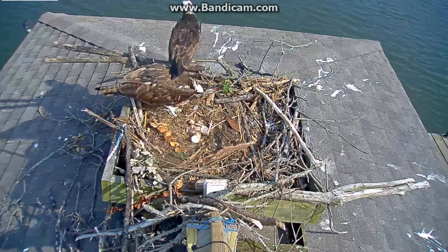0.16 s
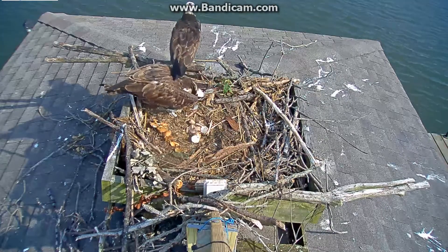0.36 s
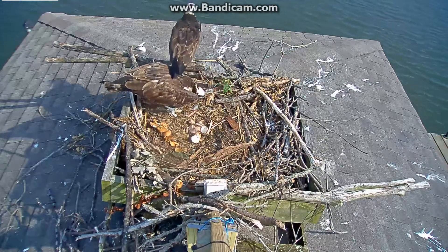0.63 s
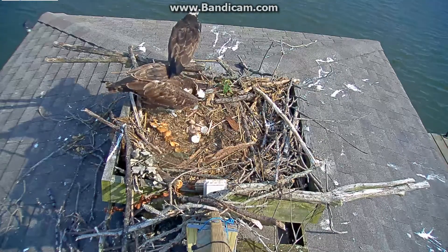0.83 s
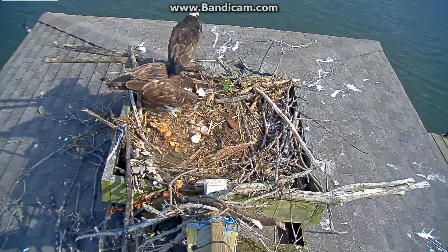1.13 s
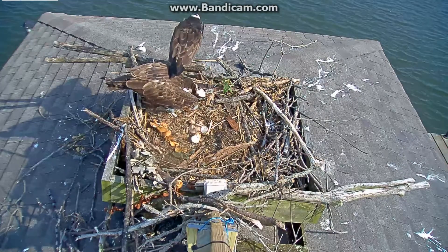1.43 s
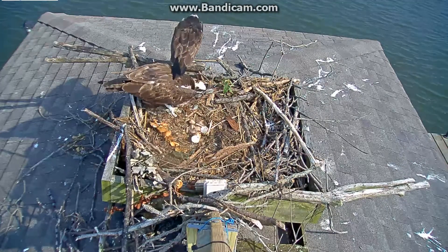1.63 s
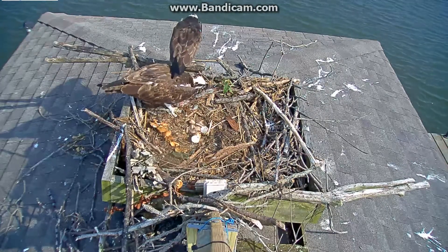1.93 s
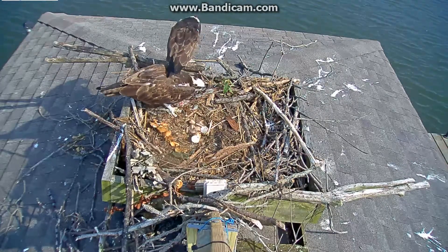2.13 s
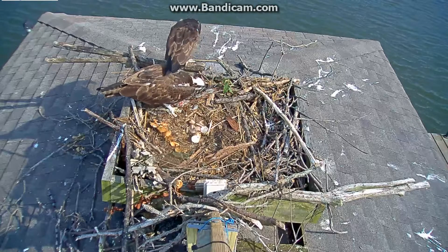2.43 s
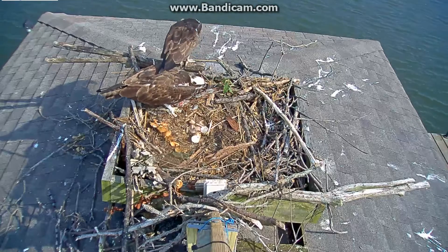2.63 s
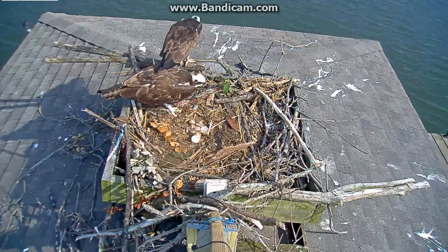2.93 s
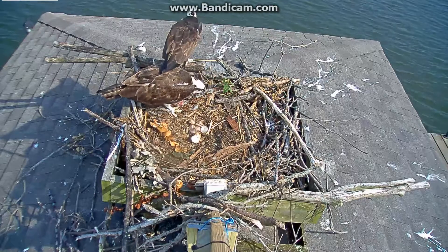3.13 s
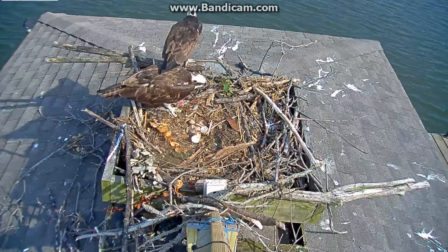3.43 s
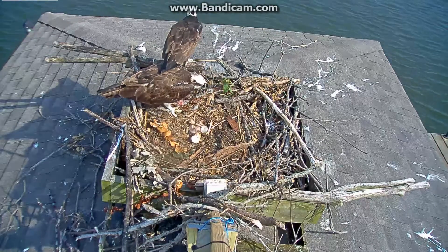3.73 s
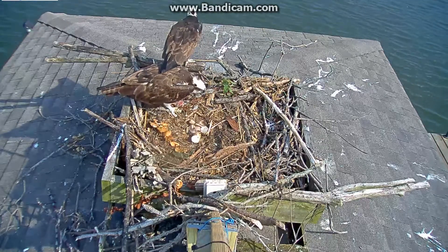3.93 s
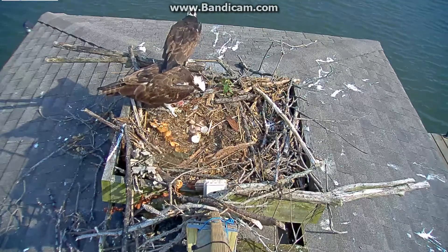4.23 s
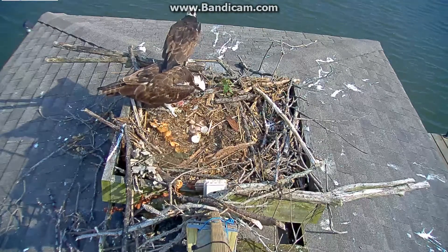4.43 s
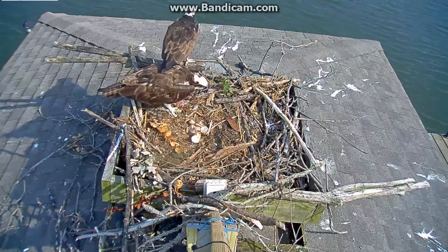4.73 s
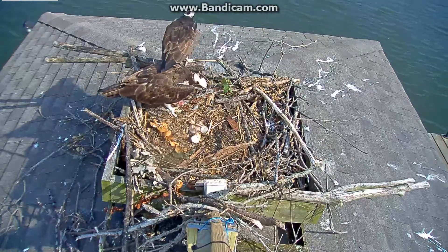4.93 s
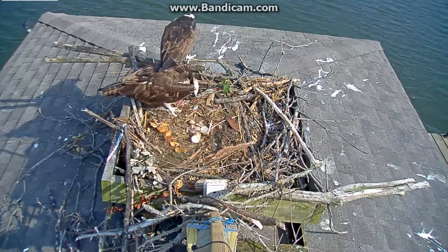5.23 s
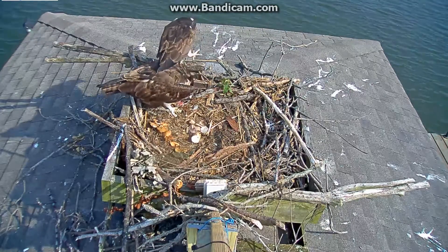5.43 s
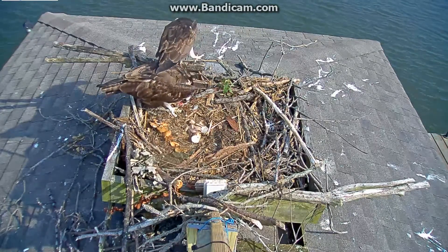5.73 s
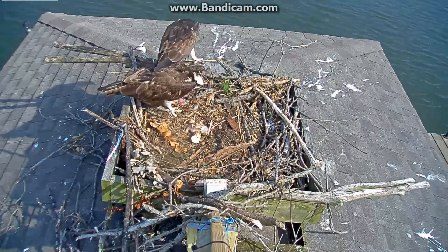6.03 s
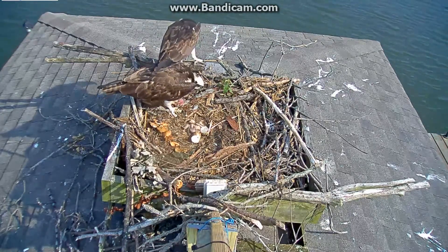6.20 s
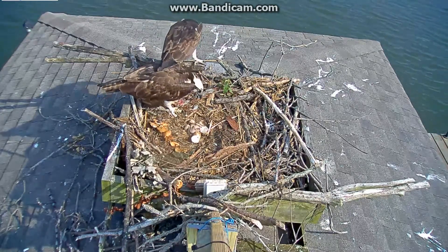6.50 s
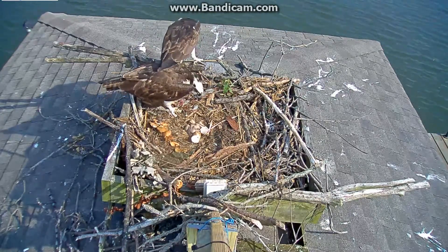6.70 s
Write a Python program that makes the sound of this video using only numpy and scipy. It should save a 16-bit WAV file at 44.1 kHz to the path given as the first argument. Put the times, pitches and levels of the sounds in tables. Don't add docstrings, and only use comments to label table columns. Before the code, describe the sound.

Quick diving peeps and small twig ticks over a faint engine hum, four flat distant whistles, one loud chirp, then heavy wind buffeting.

```python
import sys
import numpy as np
from scipy import signal
from scipy.fft import rfft, irfft, next_fast_len
from scipy.io import wavfile
from scipy.ndimage import uniform_filter1d

SR = 44100
rng = np.random.default_rng(int(sys.argv[2]) if len(sys.argv) > 2 else 0)


def level_to_linear(level):
    exponent = np.asarray(level, float) / 20
    return 10 ** exponent


def wav_out(sig):
    wavfile.write(sys.argv[1], SR, np.round(np.clip(np.atleast_2d(sig).T, -1, 1) * 32767).astype(np.int16))


N = 302495

# (pitch [Hz], wander [Hz], level [dB])
DRONE = [
    (59.5, 2.0, -45.5),
    (120, 9.0, -63),
    (215, 4.0, -74),
    (330, 4.0, -79),
]


def rms_one(x):
    return x / np.sqrt(np.mean(x ** 2) + 1e-20)


def in_time(rows):
    s, *columns = np.transpose(rows)
    return [np.interp(np.arange(N) / SR, s, c) for c in columns]


def at_hz(points, hz):
    known_hz, known_db = np.transpose(points)
    return np.interp(np.log(hz), np.log(known_hz), known_db)


def drift(rate):
    r = np.exp(-80 * np.pi * rate / SR)
    slow = signal.lfilter([1], [1, -2 * r, r * r], rng.standard_normal(N // 40 + 2002))[2000:]
    return np.interp(np.arange(N) / 40, np.arange(len(slow)), rms_one(slow))


def coloured(spectrum):
    size = next_fast_len(N)
    hz = np.maximum(np.arange(size // 2 + 1) * SR / size, 1)
    white = rfft(rng.standard_normal(size))
    return rms_one(irfft(white * level_to_linear(at_hz(spectrum, hz)), size)[:N])


def resonance(x, hz, width_hz):
    r = np.exp(-np.pi * width_hz / SR)
    zeros = np.array([1, 0, -1]) * (1 - r * r) / 2
    return signal.lfilter(zeros, [1, -2 * r * np.cos(2 * np.pi * hz / SR), r * r], x)


def steep_resonance(x, hz, width_hz):
    return resonance(resonance(x, hz, width_hz), hz, width_hz)


def add(out, s, sound):
    i = round(s * SR)
    out[i:i + len(sound)] += sound[:N - i]


def tone(hz, db, multiple=1):
    return np.sqrt(2) * level_to_linear(db) * np.sin(2 * np.pi * multiple * np.cumsum(hz) / SR)


def soft_ends(size, fade_s):
    t = np.arange(size) / SR
    return np.clip(np.minimum(t, t[::-1]) / fade_s, 0, 1)


def swell_db(t, s, fade_ms):
    rise_share, roundness = 0.79, 1.5
    late = (t - s) * 1000 / max(fade_ms, 12)
    return -10 * np.maximum(late, -late / rise_share) ** roundness


def gusts():
    # (peak [s], rumble [dB], time to fade 10 dB [ms], rustle over rumble [dB], sway [Hz])
    gust_peaks = [(0.07, -17.5, 21, -27, 66.3), (.108, -21.5, 41, -19, 56.25),
                  (0.259, -27.5, 48, -23, 42.8), (0.307, -26.5, 63.5, -22, 54.4),
                  (0.507, -20.5, 49, -30, 44.78), (0.57, -40, 47.5, -28, 59.25),
                  (0.631, -23, 58.5, -22.5, 72.7), (0.694, -14.5, 42, -12.5, 61.65),
                  (0.82, -24, 54, -18, 40.04), (0.948, -36, 94, -40, 52.97), (1.104, -32, 100, -19, 50.98),
                  (1.209, -29.5, 99, -28, 41.17), (1.355, -27, 48, -32, 42.03),
                  (1.427, -27, 93.5, -27.5, 56.2), (1.548, -39, 77, -21, 35.35),
                  (1.647, -29.5, 35, -29.0, 50.75), (1.763, -30.5, 46, -37, 32.76),
                  (4.27, -21.5, 33.5, -26, 49.66), (4.338, -21, 27, -25.5, 39.86),
                  (4.385, -28, 25, -35, 34.8), (4.51, -33, 47, -32, 47.77), (4.687, -24.5, 60, -28, 65.23),
                  (4.779, -30.5, 61, -20, 52.3), (4.856, -16.5, 49.5, -29, 49.67),
                  (5.07, -37.5, 99, -21, 52.5), (5.287, -41, 59, -32, 54.65),
                  (5.554, -30, 38.5, -12, 54.65), (5.73, -37.5, 48, -33, 48.5),
                  (5.905, -35.5, 102, -20, 45.1), (6.005, -28.5, 34, -33, 57.2),
                  (6.064, -32.5, 44, -18, 38.7), (6.195, -29.5, 34, -21, 75.4),
                  (6.238, -18, 42, -28, 50.43), (6.288, -14.5, 75, -16, 58.76), (6.36, -9.5, 29, -9, 66.2),
                  (6.428, -24.5, 102, -9.5, 48.67), (6.473, -19.5, 108.5, -21, 49.6),
                  (6.535, -14.5, 62.5, -3, 57.54), (6.585, -21.5, 97, -22, 45.72),
                  (6.697, -15.5, 43, -26, 54.5), (6.811, -17, 94.5, -11, 62.4)]
    # (peak [s], level [dB], time to fade 10 dB [ms])
    bursts = [(.06, -44, 34), (.115, -45.5, 41), (.5, -48, 35), (.672, -34.5, 35.5), (.735, -39.5, 50),
              (.83, -44.5, 35), (1.37, -57, 59), (4.78, -49, 32), (4.855, -42, 40), (6.21, -36.5, 33),
              (6.302, -31, 42), (6.345, -24.5, 36), (6.42, -28, 29), (6.51, -27.5, 38.5), (6.56, -28.5, 45),
              (6.71, -36, 30.5), (6.77, -31, 35), (6.835, -36, 38)]
    # (time [s], rumble [dB])
    breeze = [(0, -32), (.9, -30.5), (1.0, -41), (1.5, -39), (1.9, -44), (2.6, -43), (3.5, -44.5),
              (4.0, -43.5), (4.2, -48), (5.1, -42.5), (5.35, -44), (5.8, -43), (6.17, -37), (6.25, -40.5),
              (6.86, -28)]
    sway_db, eddy_db, gust_rustle_db, breeze_rustle_db = -1.5, -6, -6, -18.5
    sag_per_s = 3.0
    t = np.arange(N) / SR
    breeze_db, = in_time(breeze)
    rumble_power = level_to_linear(breeze_db) ** 2
    rustle_power = level_to_linear(breeze_db + breeze_rustle_db) ** 2
    sway, wobble = np.zeros(N), np.exp(.1 * drift(11.97))
    for s, db, fade_ms, rustle_db, hz in gust_peaks:
        near = slice(max(0, round((s - .3) * SR)), round((s + .4) * SR))
        level_db = db + swell_db(t[near], s, 0.88 * fade_ms)
        sway_hz = hz * np.exp(-sag_per_s * (t[near] - s)) * wobble[near]
        sway[near] += tone(sway_hz, level_db + sway_db)
        rumble_power[near] += level_to_linear(level_db + eddy_db) ** 2
        rustle_power[near] += level_to_linear(level_db + rustle_db + gust_rustle_db) ** 2
    for s, db, fade_ms in bursts:
        rustle_power += level_to_linear(db + swell_db(t, s, fade_ms)) ** 2
    return sway, np.sqrt(rumble_power), np.sqrt(rustle_power)


def wind():
    # (frequency [Hz], density [dB per Hz])
    thump_spectrum = [(11, -49), (20, 4), (43, -5.5), (65, -6), (110, -9.5), (160, -29), (260, -65),
                      (440, -120)]
    # (frequency [Hz], density [dB per Hz])
    rustle_spectrum = [(60, -32), (110, 9), (160, 8.5), (220, -2.5), (300, -7.5), (530, -19.5), (800, -32),
                       (1300, -41), (2000, -51.5), (4000, -73)]
    sway, rumble, rustle_gain = gusts()
    hum_power = level_to_linear(DRONE[0][2]) ** 2
    gust = np.sqrt(np.maximum(rumble ** 2 - hum_power, .2 * rumble ** 2))
    low_cut = signal.butter(2, 32, "high", fs=SR, output="sos")
    thump = signal.sosfilt(low_cut, coloured(thump_spectrum))
    thump = thump / (uniform_filter1d(thump ** 2, size=3500) + 1e-3) ** .3
    rustle = coloured(rustle_spectrum) * level_to_linear(2.2 * drift(22))
    push = sway + gust * rms_one(thump) + rustle_gain * level_to_linear(-1.5) * rms_one(rustle)
    bend = push ** 2 - uniform_filter1d(push ** 2, size=2000)
    return .5 * np.tanh((push + 0.39 * bend) / .5)


def background():
    # (frequency [Hz], density [dB])
    air = [(88, -28.5), (150, -8), (261, -11.5), (328, -12), (619, -17), (945, -18), (1040, -19.5),
           (1310, -18.5), (1570, -17), (1940, -16), (3370, -13), (6460, -21), (7360, -27.5), (9570, -64),
           (16200, -120)]
    # (pitch [Hz], level [dB])
    whine = [(1050, -80), (1588, -81), (2099, -77), (2132, -82), (3822, -82), (4172, -82), (4231, -82),
             (4517, -82), (5211, -82), (5905, -85), (6605, -85)]
    out = level_to_linear(-61) * coloured(air)
    for hz, wander_hz, db in DRONE:
        out = out + tone(hz + wander_hz * drift(5), db + 2.8 * drift(7))
    for hz, db in whine:
        out = out + tone(hz + 3.0 * drift(4), db + 1.2 * drift(3))
    return out


def twitter():
    # (time [s], level [dB])
    flock = [(0.0, -63), (2.39, -66), (2.71, -65), (3.36, -61), (4.07, -61), (4.42, -55.5), (4.77, -69),
             (4.85, -56.5), (5.22, -61), (5.52, -62.5), (5.73, -53.5), (6.21, -56.5), (6.32, -56),
             (6.86, -62.5)]
    chips_per_s = 130
    level_db, = in_time(flock)
    draws, chips = rng.random((N // 64, 5)), np.zeros(N)
    for k in np.flatnonzero(draws[:, 0] < chips_per_s * 64 / SR):
        pitch, bend, length, size = draws[k, 1:]
        u = np.linspace(-1, 1, round((0.0012 + 0.0074 * length) * SR))
        hz = 2600 + 1500 * pitch - 450 * u * (1.3 * bend - .4)
        add(chips, k * 64 / SR, tone(hz, 9 * size) * (1 - u ** 2))
    blur = steep_resonance(rng.standard_normal(N), 3280, 1000) * level_to_linear(3.0 * drift(30))
    return level_to_linear(level_db - 4) * rms_one(rms_one(blur) + level_to_linear(-3) * rms_one(chips))


def crackle():
    twigs_per_s = 22
    sizes = level_to_linear(4.5 * np.minimum(rng.exponential(1, N), 3)) * (rng.random(N) < twigs_per_s / SR)
    bright = rng.random(N) < .35
    dull_snaps = resonance(sizes * ~bright, 3400, 1300)
    bright_snaps = resonance(sizes * bright, 5600, 2500)
    return level_to_linear(-61.0) * (dull_snaps + .6 * bright_snaps)


def flicks():
    # (time [s], peak [dB], centre [Hz], decay [ms])
    eddies = [(.058, -27.5, 134, 13.6), (.058, -62, 850, 4.5), (.106, -63, 510, 8), (.122, -52, 300, 5.5),
              (.303, -54, 400, 5.5), (.675, -51, 500, 8), (.75, -55, 800, 4), (.82, -53, 452, 8),
              (6.208, -51, 498, 5.8), (6.302, -26, 140, 8), (6.306, -55, 890, 10), (6.338, -48, 750, 3.1),
              (6.352, -28, 140, 11), (6.356, -54, 1050, 7.8), (6.37, -44, 550, 11),
              (6.417, -45.5, 845, 7.9), (6.487, -48, 850, 5), (6.511, -47.5, 905, 12),
              (6.512, -22, 125, 11), (6.533, -51, 1095, 3.5), (6.556, -43.5, 650, 12),
              (6.575, -49.5, 1700, 4), (6.604, -51, 700, 5), (6.725, -49.5, 453, 8)]
    out, t = np.zeros(N), np.arange(3000) / SR
    for s, db, hz, decay_ms in eddies:
        late = 1000 * t / decay_ms
        puff = rng.standard_normal(len(t)) * late * np.exp(-2 * late)
        flick = steep_resonance(puff, hz, 0.45 * hz)
        add(out, s, flick / np.max(np.abs(flick)) * level_to_linear(db))
    return out


def peeps():
    # (top of the arch [s], top to end [s], top [Hz], arch [dB], dive [dB])
    calls = [(0.204, 0.025, 3900, -47.5, -51), (.460, .031, 4220, -46, -45.5),
             (0.694, .033, 3950, -44.5, -43.5), (.930, 0.025, 4130, -52.5, -40),
             (1.182, 0.0355, 5000, -49.5, -42), (1.461, .033, 5420, -61, -42),
             (1.718, 0.036, 5500, -46, -40), (1.972, .032, 4550, -53.5, -40),
             (2.221, .039, 5520, -56, -41.5), (2.474, 0.0265, 5270, -88, -48.5),
             (2.973, 0.033, 5600, -50, -64), (3.492, 0.05, 5370, -56, -55.5),
             (3.761, .045, 4700, -55.5, -62), (4.047, 0.037, 5800, -49, -41.5),
             (4.318, .031, 5510, -57.5, -41.5), (4.620, .015, 3800, -52.5, -43.5),
             (4.933, 0.023, 3760, -50, -50)]
    overtones_db = [-1, -4, -6]
    # (frequency [Hz], gain [dB])
    beak = [(1200, -26), (1550, -11), (1950, -6), (2500, -19), (3050, -4), (3450, 0), (4200, -5),
            (5000, -20), (6000, -19), (7200, -32)]
    climb_s, climb_s_per_octave, low_top_hz = .0095, .022, 3900
    end_hz, rise_hz, dive_bend, landing_hz = 1323, 378.3, 2.3, 587
    half_db, flutter_db, jitter, rasp_db = -17, 3, .035, -9
    out, shake, flutter = np.zeros(N), drift(170), drift(150)
    rasp = rms_one(steep_resonance(rng.standard_normal(N), 3600, 2200))
    for top_s, fall, top_hz, arch_db, dive_db in calls:
        climb = climb_s + climb_s_per_octave * np.log2(top_hz / low_top_hz)
        s = top_s - climb
        t = np.arange(round((climb + fall) * SR)) / SR - climb
        now = slice(round(s * SR), round(s * SR) + len(t))
        down = np.clip(t / fall, 0, 1)
        hz = top_hz - rise_hz * climb / climb_s * np.clip(-t / climb, 0, 1) ** 2
        hz = hz - (top_hz - end_hz + landing_hz) * down ** dive_bend
        hz = end_hz + landing_hz * np.logaddexp(0, (hz - end_hz) / landing_hz)
        hz = hz * (1 + jitter * down * shake[now])
        push = np.minimum(np.interp(hz, [3900, 4500], [1, 0]), np.interp(down, [.25, .6], [0, 1]))
        effort_db = arch_db + push * (dive_db - arch_db) + flutter_db * (.6 + .4 * down) * flutter[now]
        voice = np.zeros(len(t))
        for k, db in enumerate(overtones_db, 1):
            voice += tone(hz, effort_db + db + at_hz(beak, k * hz), k)
        strain = np.interp(down, [.45, .65, .85], [0, 1, 0])
        voice += strain * (tone(hz, effort_db + half_db, .5) + level_to_linear(effort_db + rasp_db) * rasp[now])
        add(out, s, voice * soft_ends(len(t), .003))
    return out


def notes():
    # (start [s], length [s], top [Hz], depth [Hz], level [dB])
    arches = [(1.166, 0.023, 3370, 280, -56), (2.365, 0.045, 3290, 60, -62.5), (2.98, 0.052, 1906, 60, -71),
              (4.432, 0.026, 3930, 400, -60), (4.506, 0.022, 3830, 450, -59.5),
              (4.700, 0.081, 4560, 45, -71), (4.774, .031, 4820, 20, -69.5), (5.501, 0.034, 4290, 130, -61),
              (5.727, 0.024, 1510, 40, -56), (6.049, 0.032, 3620, 608, -44),
              (6.193, 0.019, 3700, 900, -57.5), (6.358, 0.045, 3235, 620, -45.5),
              (6.609, 0.02, 4370, 600, -61), (6.694, .016, 4250, 550, -56), (6.76, 0.02, 4400, 800, -58),
              (6.838, 0.017, 4400, 750, -61)]
    # (start [s], length [s], first [Hz],
    # last [Hz], level [dB])
    slides = [(2.205, 0.0073, 3600, 2620, -50.5), (2.644, 0.042, 2880, 2500, -62.5),
              (3.646, 0.031, 3556, 3000, -55.5), (3.873, 0.05, 4000, 3800, -65),
              (4.016, .009, 4800, 4550, -53), (4.022, 0.012, 4140, 3900, -49.5),
              (4.028, 0.005, 4900, 5550, -60), (4.153, 0.018, 3310, 2890, -58),
              (4.205, 0.070, 3120, 3300, -54), (4.277, 0.0068, 3800, 3370, -52),
              (4.296, 0.011, 3900, 3260, -54), (4.338, 0.005, 3540, 3280, -37),
              (4.788, 0.025, 3734, 3000, -52), (4.846, 0.016, 3340, 2960, -57),
              (5.725, .036, 3820, 3450, -54), (6.517, 0.032, 3545, 3075, -55),
              (6.745, .05, 3900, 3830, -64.5), (6.624, 0.0075, 4400, 3800, -61),
              (6.415, 0.0077, 3200, 3350, -44.5), (.908, 0.012, 3200, 3830, -63),
              (1.946, 0.017, 3500, 4200, -60), (3.008, 0.022, 3600, 3100, -61.5),
              (3.236, 0.027, 5400, 3370, -58), (3.266, 0.009, 3450, 3000, -49.5),
              (3.273, 0.01, 2700, 1304, -60.5), (3.508, 0.013, 4860, 3830, -60),
              (3.528, .01, 3200, 1710, -57), (4.459, 0.022, 3900, 3200, -65),
              (4.596, .02, 3100, 3680, -55.5), (4.628, .016, 3800, 3650, -59),
              (5.214, 0.008, 3830, 4480, -53), (5.241, .012, 4300, 3530, -60),
              (6.398, 0.0069, 2480, 1210, -59), (4.196, .016, 3900, 3470, -60),
              (1.446, .02, 4720, 5300, -66), (1.990, 0.0069, 4190, 3840, -46),
              (3.005, .02, 2180, 1950, -62.5),
              (.208, .015, 3800, 3050, -44.5), (.470, .010, 3750, 3500, -46),
               (0.93, 0.011, 4000, 2900, -46.5), (1.166, .01, 3900, 4700, -63),
               (1.200, 0.011, 3850, 3330, -40.5), (1.488, .008, 4100, 3400, -54),
               (1.7, 0.02, 3700, 5300, -65), (1.73, 0.0063, 4280, 3850, -51),
               (2.16, 0.0068, 5800, 5700, -55), (4.342, 0.0053, 6000, 5500, -55),
               (5, .009, 4500, 3200, -47.5), (4.079, .007, 6000, 5000, -55), (2.498, .005, 3700, 3300, -55),
               (.222, .012, 3300, 1600, -63)]
    # (start [s], length [s], first [Hz], last [Hz], level [dB])
    hooks = [
        (3.907, 0.0206, 3530, 4070, -54.5),
        (3.923, 0.031, 3900, 3200, -51.5),
        (5.665, 0.013, 2040, 1940, -51),
        (5.724, 0.067, 2300, 2000, -58.5),
        (5.75, 0.019, 4700, 4000, -53),
    ]

    def arch(v, top, depth):
        return top - depth * (2 * v - 1) ** 2

    def slide(v, first, last):
        return first + (last - first) * v

    def hook(v, first, last):
        return first + (last - first) * v ** 1.8

    out, flutter = np.zeros(N), level_to_linear(2.0 * drift(90))
    for rows, shape in [(arches, arch), (slides, slide), (hooks, hook)]:
        for s, length, *pitch, db in rows:
            v = np.linspace(0, 1, round(length * SR))
            swell = (1 - (2 * v - 1) ** 2) ** 0.85
            add(out, s, tone(shape(v, *pitch), db) * swell)
    return out * flutter


def ticks():
    # (time [s], peak [dB], centre [Hz], decay [ms])
    twigs = [(.838, -45.5, 3600, 3.8), (.983, -50.5, 2980, 13), (1.444, -44, 3300, 1.9),
             (1.678, -47, 3280, 2.2), (1.702, -41.5, 3300, 3.1), (1.718, -39, 3400, 1.8),
             (1.92, -45.5, 6000, 0.5), (2.536, -46.5, 3900, 2.8), (2.545, -44, 4170, 1),
             (2.7325, -41.5, 3383, 2.0), (2.802, -41.5, 5870, 0.46), (2.832, -41.5, 2820, 1.8),
             (2.916, -44.5, 6100, 0.43), (2.957, -44.5, 3180, 3.3), (3.001, -43, 5840, 0.56),
             (3.474, -39.5, 3670, 2.5), (3.744, -45, 3515, 1.44), (4.29, -47.5, 3384, 2.1),
             (4.951, -58.5, 4520, 1.2), (4.976, -50, 4700, 4.0), (4.995, -49, 4307, 9.3),
             (6.046, -61, 4130, 1.5), (6.266, -55.5, 3950, 1.3), (6.277, -43.5, 3520, 1.7),
             (6.414, -39.5, 3380, 3.0), (6.472, -43.5, 2970, 12), (0.415, -45.5, 2800, 2.4),
             (1.1, -49, 3380, 4), (2.447, -52.5, 3800, 1.7), (2.57, -53, 5300, 0.85),
             (2.721, -48, 3000, 2.0), (2.756, -50, 1900, 2.8), (2.933, -47, 3200, 3.3),
             (3.144, -50, 2800, 1.9), (3.172, -61, 3800, 4.0), (3.206, -50, 6200, 0.38),
             (3.461, -48.5, 4250, 1.6), (5.001, -43, 3600, 2.0), (5.009, -46.5, 3600, 4.0),
             (5.265, -55, 1700, 2.0), (6.351, -62, 1600, 1.5), (6.415, -47, 4000, 5.5),
             (6.48, -46, 3910, 6.7), (6.672, -51, 3200, 5.1), (1.549, -48.5, 5630, .4),
             (3.268, -52, 3300, 2.9)]
    # (time [s], peak [dB], centre [Hz], decay [ms], low knock [dB])
    taps = [
        (.4275, -43.5, 4000, 0.6, -39),
        (1.727, -39, 3700, 4.0, -46.5),
        (1.992, -46.5, 4320, 1.6, -44),
        (2.028, -40, 3800, 2.0, -41),
        (5.738, -39, 3300, 3.0, -63),
        (6.576, -46, 3630, 0.81, -54.5),
    ]
    twig_knock_db, knock_hz, knock_width_hz = -70, 1320, 910
    width_share, width_hz_ms, rise_share = 0.34, 450, 0.077
    out, t = np.zeros(N), np.arange(1200) / SR
    rows = [(*row, twig_knock_db) for row in twigs] + list(taps)
    for s, db, hz, decay_ms, knock_db in rows:
        rise = np.minimum(1000 * t / (rise_share * decay_ms), 1)
        puff = rng.standard_normal(len(t)) * np.exp(-1000 * t / decay_ms) * rise
        snap = steep_resonance(puff, hz, width_share * hz + width_hz_ms / decay_ms)
        knock = resonance(puff, knock_hz, knock_width_hz)
        snap = snap / np.max(np.abs(snap)) * level_to_linear(db)
        knock = knock / np.max(np.abs(knock)) * level_to_linear(knock_db)
        add(out, s, snap + knock)
    return out


def whistles():
    # (start [s], length [s], first [Hz], last [Hz], level [dB])
    calls = [
        (4.157, 0.12, 2790, 2850, -45),
        (4.412, 0.14, 2815, 2867, -44),
        (4.672, .14, 2816, 2866, -43.5),
        (4.936, 0.14, 2820, 2860, -43),
    ]
    attack_s, swell_s, release_s = 0.023, 0.082, 0.011
    edge_db, soft_db, waver_hz = -19.5, -3, 6.2
    out, waver_db, t = np.zeros(N), 0.46 * drift(40), np.arange(N) / SR
    for s, length, first_hz, last_hz, db in calls:
        steps = s + np.array([0, attack_s, swell_s, length - release_s, length])
        level_db = db + np.interp(t, steps, [edge_db, soft_db, 0, -1.2, edge_db])
        pitch = np.interp(t, [s, s + length], [first_hz, last_hz]) + waver_hz * waver_db
        out += tone(pitch, level_db + waver_db) * (t > s) * (t < s + length)
    return out


def chirp():
    # (time [s], pitch [Hz], level [dB], beak opening as second partial over first [dB])
    curve = [
        (5.558, 2230, -51, -38),
        (5.568, 2078, -32.5, -29),
        (5.574, 2024, -31.5, -16),
        (5.581, 2001, -27, -5.5),
        (5.604, 2026, -20, -7),
        (5.615, 1980, -26, 1),
        (5.635, 1864, -28.5, 6),
        (5.649, 1732, -33.5, 2),
        (5.656, 1510, -51, -4),
    ]
    third_db, third_opens, third_effort = -17.5, 1.34, 0.54
    rasp_db, rasp_spread_s, halo_db = -20.5, 0.06, -11.5
    hz, first_db, open_db = in_time(curve)
    third_level_db = first_db + third_db + third_opens * open_db + third_effort * (first_db - first_db.max())
    voice = tone(hz, first_db) + tone(hz, first_db + open_db, 2) + tone(hz, third_level_db, 3)
    air = rng.standard_normal(N)
    rasp = rms_one(steep_resonance(air, 3350, 980))
    rasp = rasp + level_to_linear(halo_db) * rms_one(steep_resonance(air[::-1], 5200, 1600))
    t = np.arange(N) / SR
    on = (t > curve[0][0]) * (t < curve[-1][0])
    breath_power = uniform_filter1d(on * level_to_linear(first_db + rasp_db) ** 2, size=round(rasp_spread_s * SR))
    return voice * on + rasp * np.sqrt(np.abs(breath_power))


def roof(x):
    return x + level_to_linear(-17) * np.roll(x, round(.0062 * SR)) + level_to_linear(-31.0) * np.roll(x, round(0.019 * SR))


def scene():
    nest = roof(peeps() + notes() + chirp() + whistles() + ticks() + crackle())
    return (nest + twitter() + wind() + background() + flicks())[None]


def roll_off(x):
    return signal.sosfilt(signal.butter(12, 7510, fs=SR, output="sos"), x)


def record(dry):
    top_cut = signal.cheby2(10, 45, 7870 + 500, fs=SR, output="sos")
    mix = signal.sosfilt(top_cut, dry) - .0114
    return roll_off(mix)


dry = scene()
out = record(dry)
wav_out(out)
```